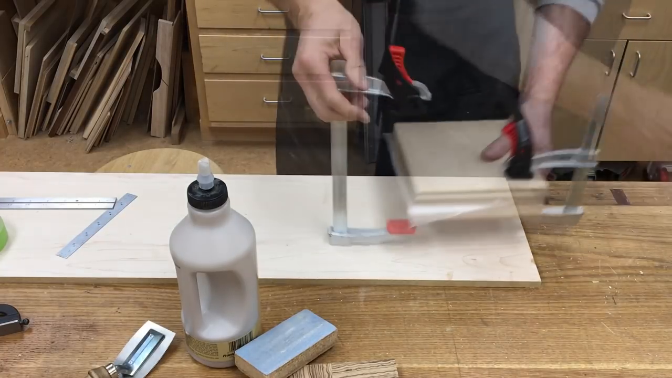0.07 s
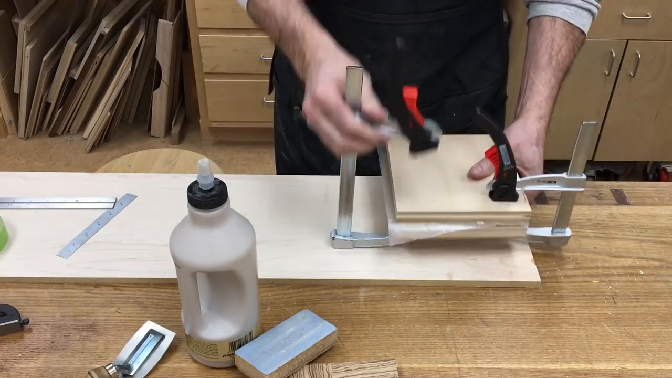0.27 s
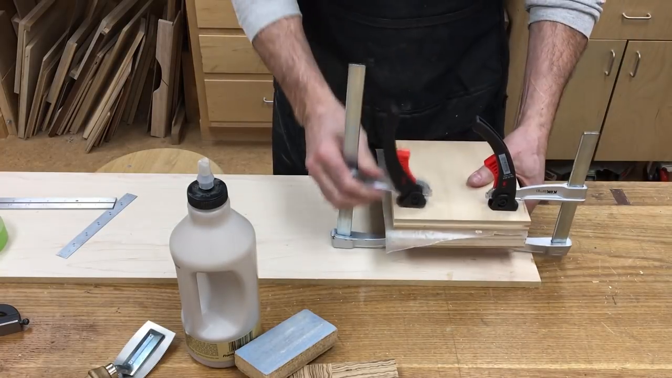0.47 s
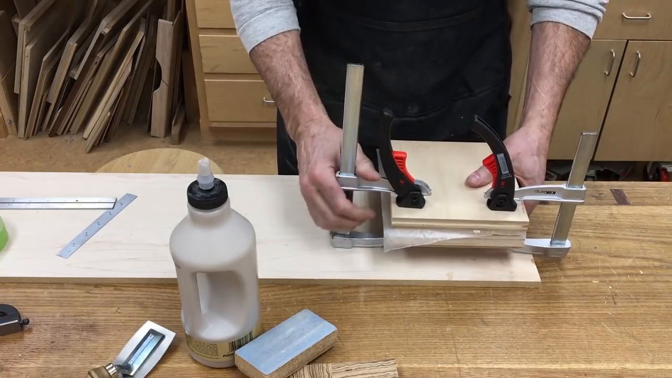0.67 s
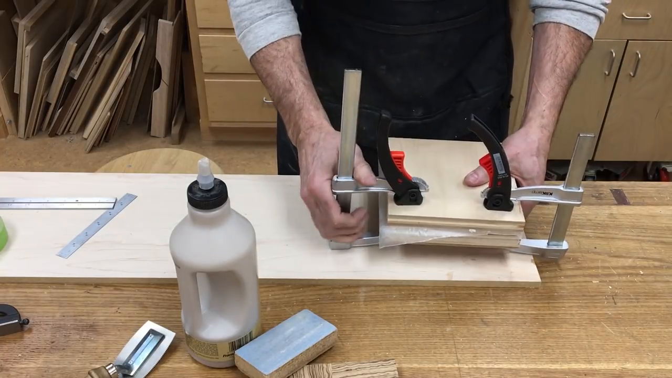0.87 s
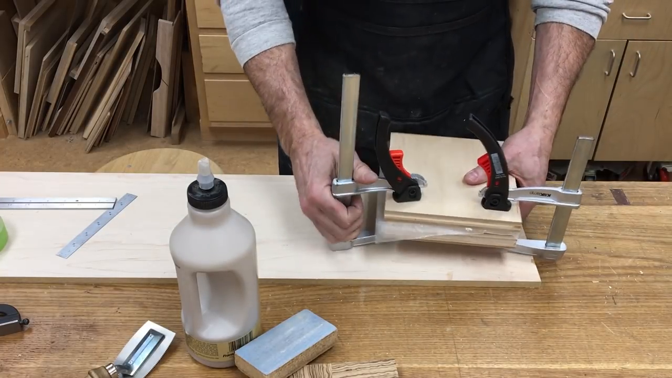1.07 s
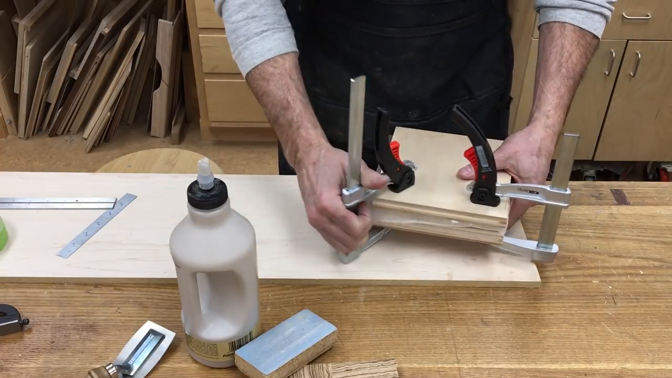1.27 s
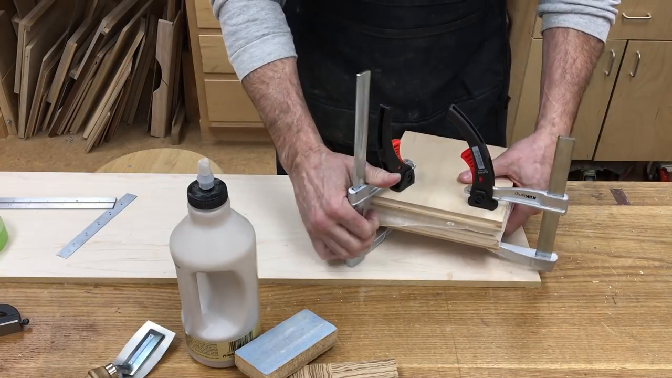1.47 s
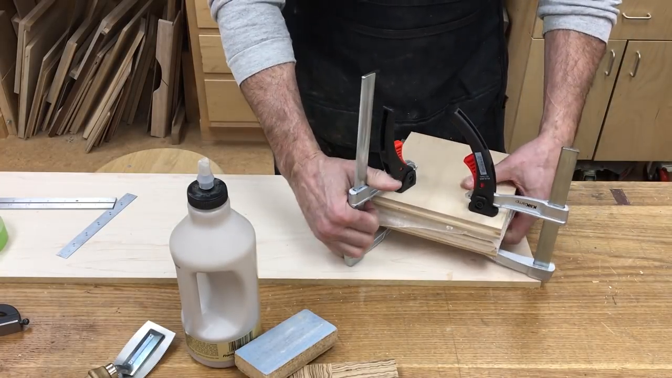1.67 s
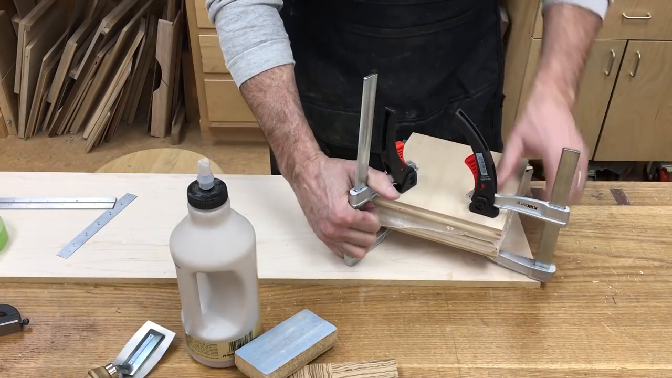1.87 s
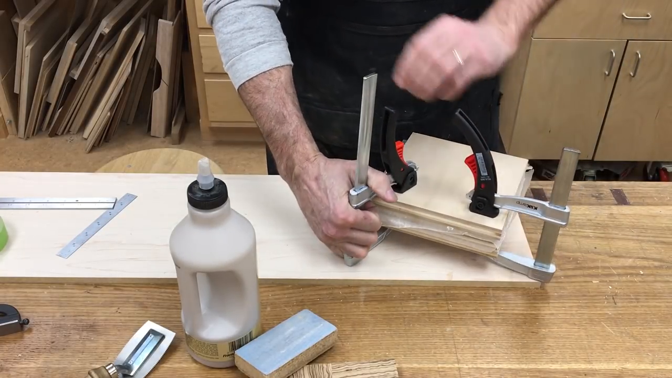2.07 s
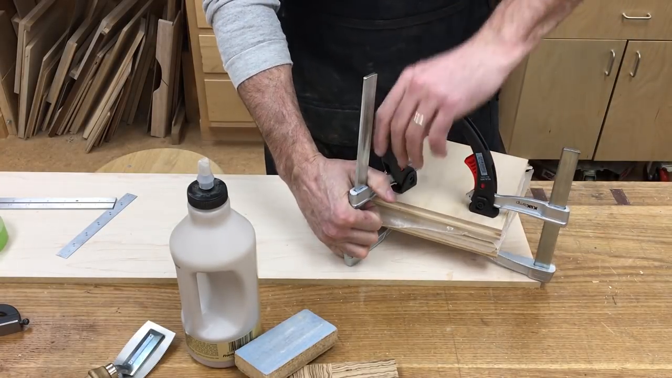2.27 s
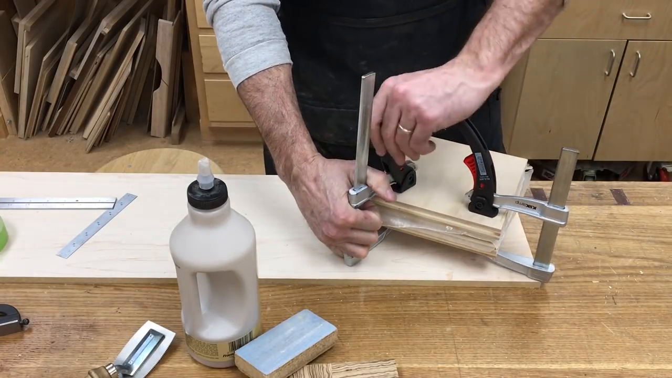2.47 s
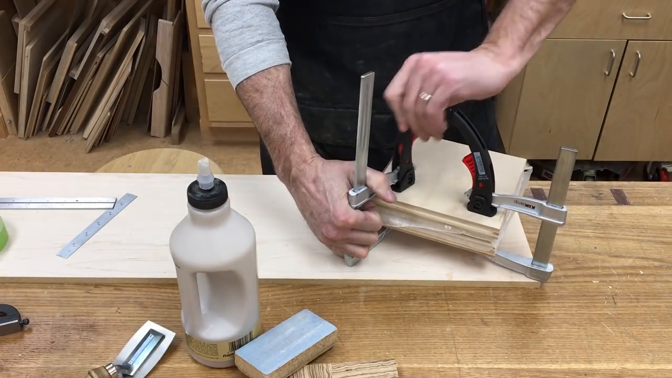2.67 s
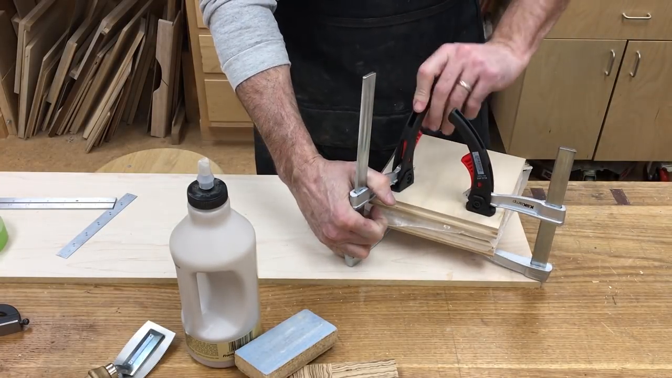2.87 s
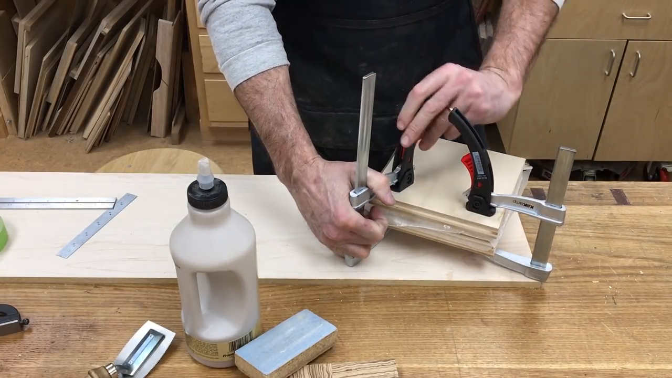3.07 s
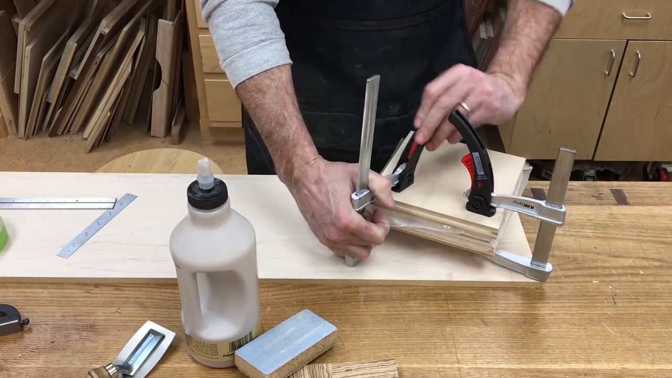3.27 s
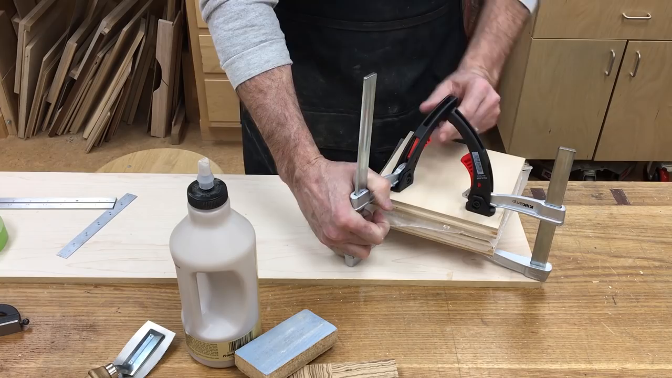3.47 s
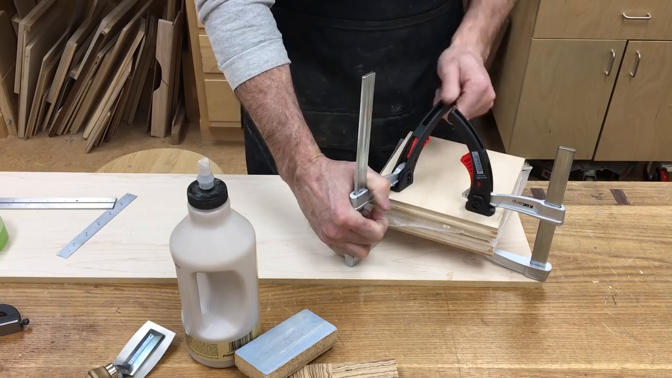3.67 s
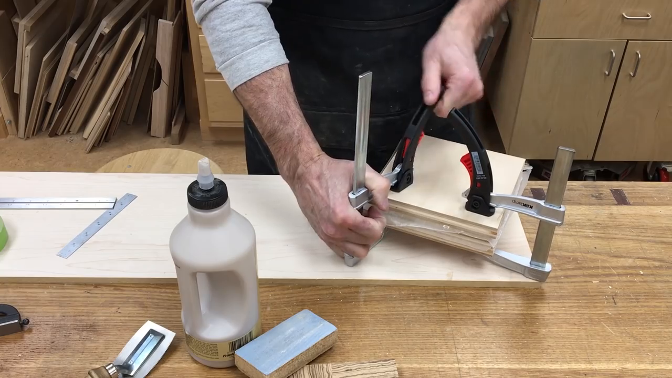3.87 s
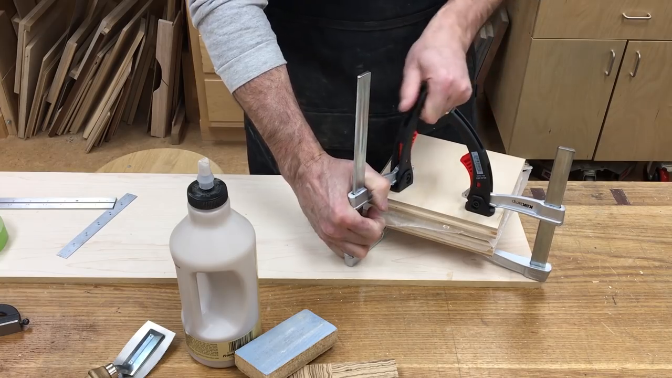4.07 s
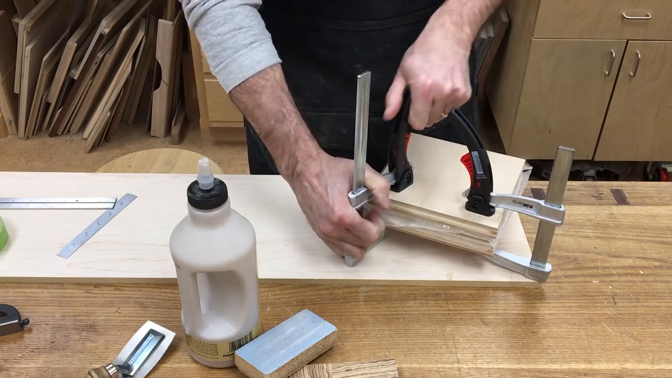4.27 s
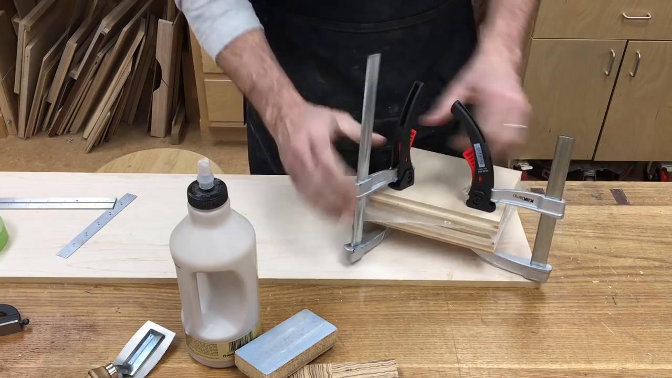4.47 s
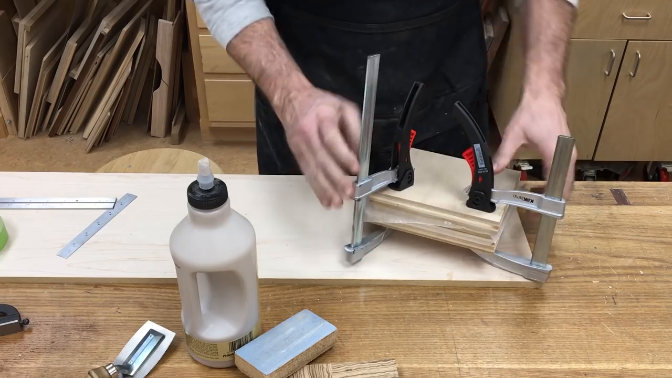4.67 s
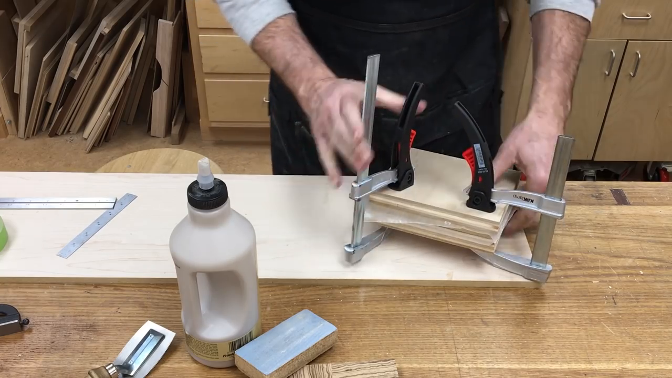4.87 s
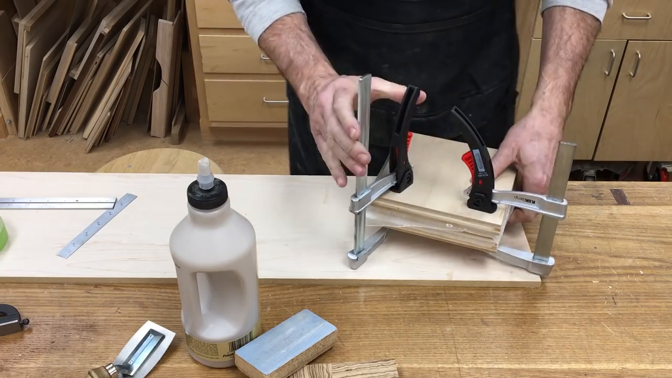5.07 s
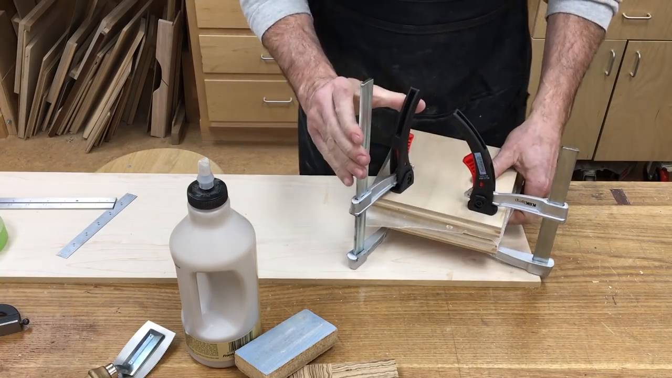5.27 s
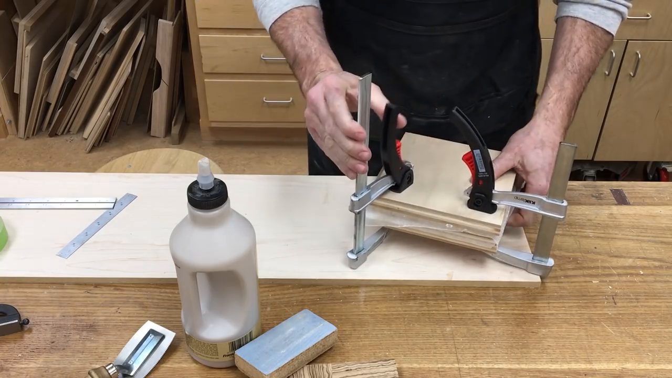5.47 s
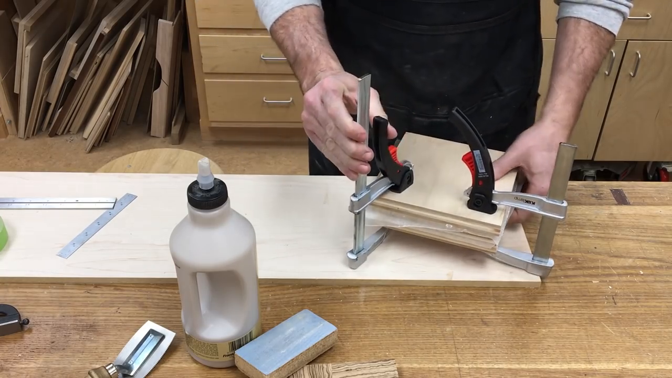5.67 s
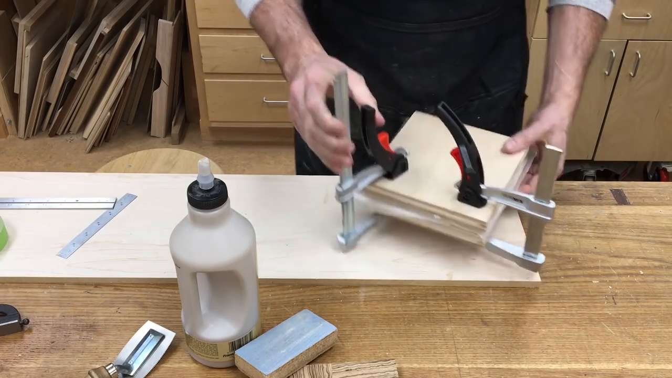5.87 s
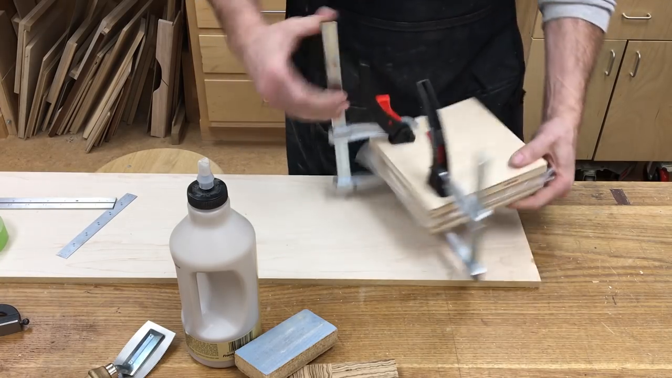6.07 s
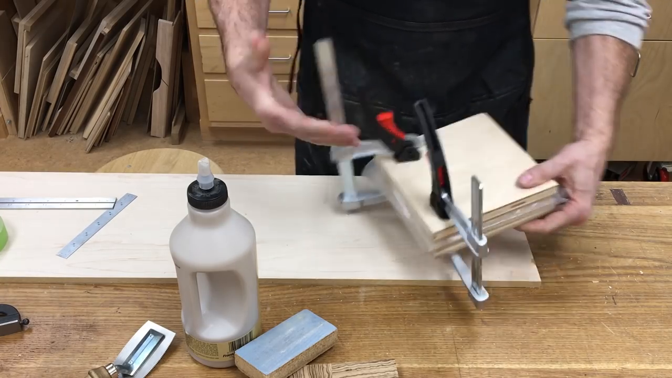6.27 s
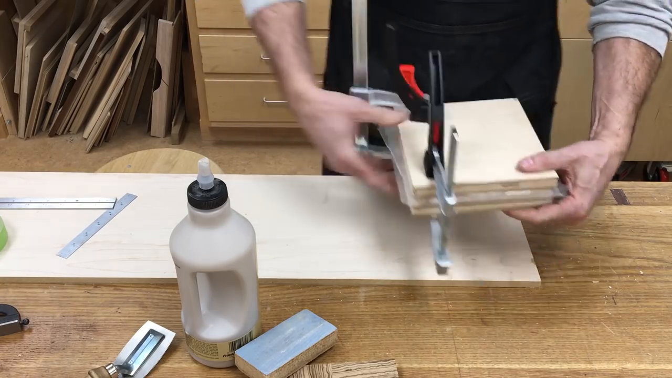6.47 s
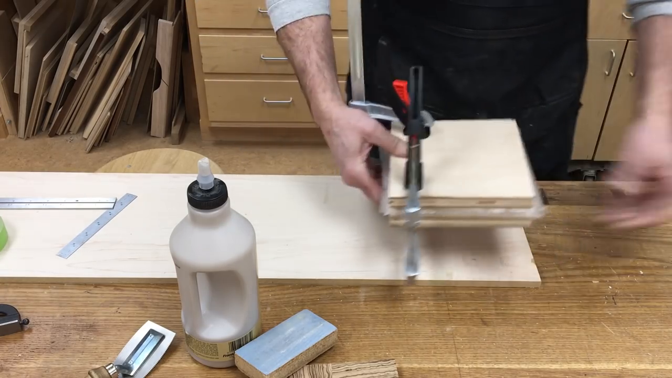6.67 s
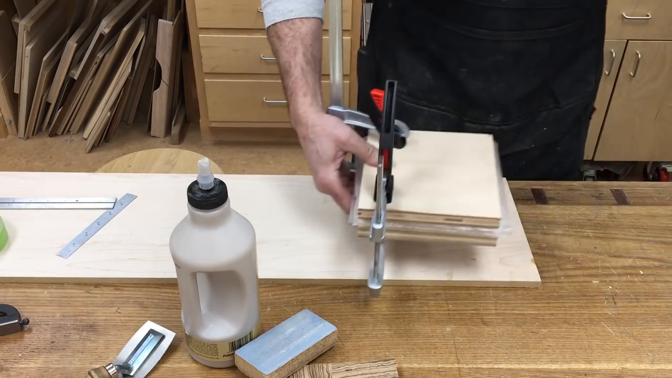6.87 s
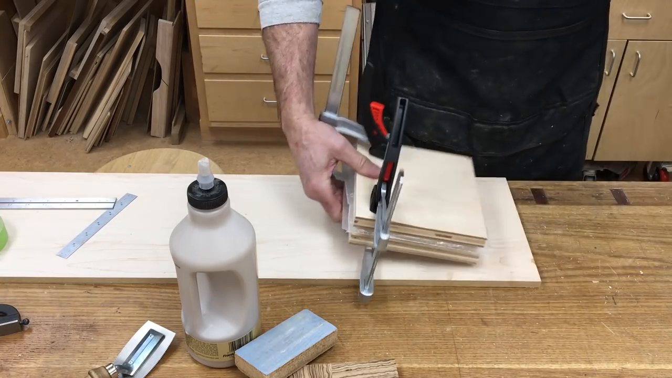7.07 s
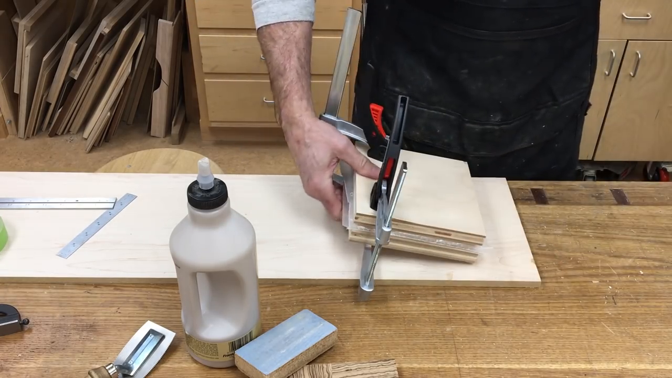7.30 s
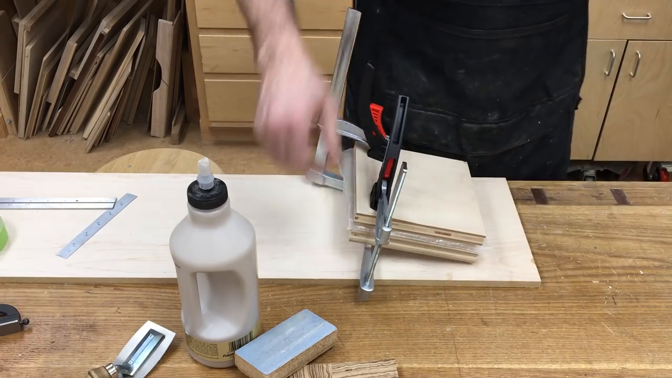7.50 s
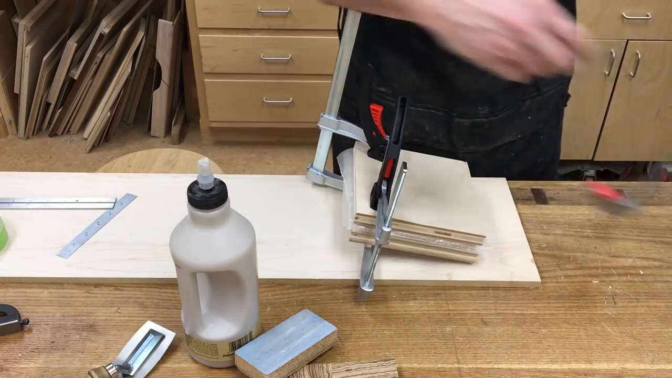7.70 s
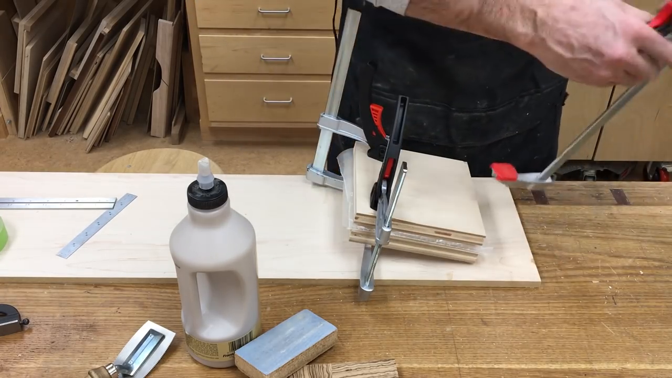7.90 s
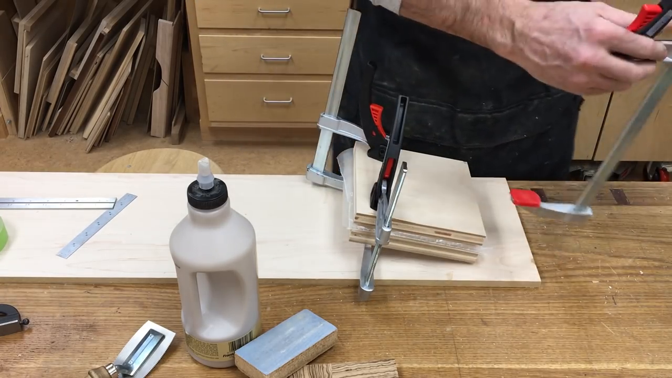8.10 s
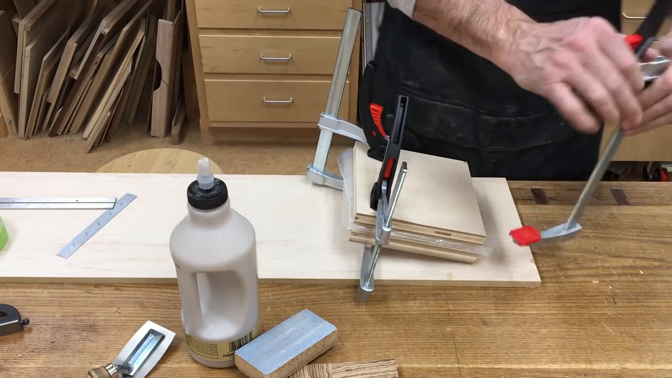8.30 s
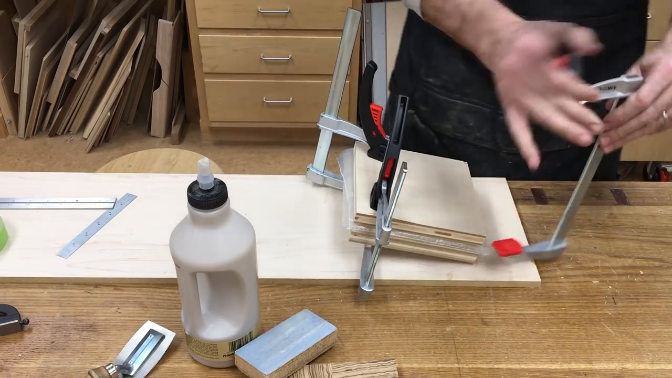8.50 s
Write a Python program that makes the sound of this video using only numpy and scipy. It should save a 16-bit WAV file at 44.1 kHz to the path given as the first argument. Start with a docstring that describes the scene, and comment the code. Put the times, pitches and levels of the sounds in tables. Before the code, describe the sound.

Close, mono view of a workbench in a small workshop with a low hum. A loud metal-and-wood clack opens, then a jaw jangles and catches down a steel bar to a hard click. Quiet handling follows, then a burst of ratchet clicks, a rattling set-down, four more clicks, and scattered wooden thuds with a few metal ticks.

```python
"""Lever bar clamps click and rattle as they are set on a small plywood press on a workbench.
Each metal contact is a short rough force that excites resonant modes of lever, bar or pad; knocks excite wood modes
and a damped thump. Clumped, filtered noise swells around them and fades like a long room tail; palms or sleeves brush
past as short hisses; a workshop hums behind as noise and a low drone.
Wall reflections follow the contacts, and loud blows saturate near full scale."""
import sys
import numpy as np
from scipy import signal
from scipy.fft import rfft, irfft, next_fast_len
from scipy.io import wavfile
from scipy.ndimage import map_coordinates

SR = 44100
rng = np.random.default_rng(int(sys.argv[2]) if len(sys.argv) > 2 else 0)


def unload_wav(signal):
    """Save mono or channel-first audio to the path in sys.argv[1] as 16-bit WAV at rate SR, clipped to [-1, 1]."""
    wavfile.write(
        sys.argv[1],
        SR,
        np.round(np.clip(np.atleast_2d(signal).T, -1, 1) * 32767).astype(np.int16),
    )


def gain_from_decibels(decibels):
    """Convert decibel values to linear amplitude factors."""
    exponent = np.asarray(decibels, float) / 20
    return 10 ** exponent


N = 376613  # samples
SPAN = 4096  # samples in one contact force
LEVER_FROM_S = 1  # touches from here on ring with the lever's modes, earlier ones with the bar's

# ratchet clicks: snap_s, peak_db, touch_lead_s (tooth touch before snap), touch_db (relative to snap)
CLICKS = [(0.7153, 6.5, .009, -7), (3.5912, -1, 0.0032, -36.5), (3.9944, 5.5, 0.0096, -23),
          (4.0965, 3.5, .009, -13.5), (4.1597, 1.5, 0.01, -20), (4.3003, 2.5, 0.0086, -24),
          (4.351, 1.5, 0.0032, -18), (4.3955, 0.5, 0.0087, -22.5), (5.5894, 4.5, 0.0031, -30.5),
          (5.6376, 3.5, 0.0053, -42.5), (5.7299, 1.5, 0.0076, -22.5), (5.8083, -0.5, .008, -15.5)]
# metal touching metal: start_s, peak_db, length_s, tilt_db_per_octave
TOUCHES = [(0.017, -22.5, 0.012, -10), (0.1917, -36.5, .006, -1.5), (0.359, -37, 0.003, -8.5),
           (0.382, -21, 0.0062, -10), (0.412, -14.5, 0.0064, -9.5), (0.443, -31, 0.0034, 1.5),
           (0.515, -18, 0.0089, -8.5), (0.564, -30, .007, -1.5), (1.4616, -22, 0.0019, -2.5),
           (1.482, -25, 0.0047, 4.5), (1.528, -32, 0.0093, -0.3), (1.589, -27.5, 0.0062, -2),
           (1.829, -26, 0.0045, -3), (2.676, -18, 0.0032, -13), (2.952, -25, 0.0024, -17),
           (3.334, -25.5, 0.0034, -12.5), (3.341, -19, 0.0033, -8), (3.53, -30, 0.0026, -14.5),
           (5.565, -36, 0.0023, 1.2), (6.262, -22.5, 0.0064, -1.5), (6.515, -25.5, 0.0033, -1.5),
           (7.342, -13, 0.0037, -15), (7.573, -24.5, 0.0076, -10.5), (7.649, -35, .005, -18.5),
           (7.792, -31, 0.0048, -12.5), (8.103, -34, 0.0037, -9), (8.1344, -9.5, 0.0042, -8.5),
           (8.16, -14, 0.005, -7.5), (8.396, -33.5, .004, -13)]
# press and clamp feet on the bench: start_s, tap_peak_db, tap_hz, thump_peak_db, thump_hz
KNOCKS = [(0.02, -27.5, 566, -31.5, 294), (0.223, 4.5, 1043, -5.5, 391), (0.241, -9.5, 510, -13, 148),
          (.383, -29.5, 517, -27, 287), (.411, -25, 582, -20.5, 288), (.717, -9.5, 850, -21.5, 290),
          (1.516, -20, 560, -25.5, 178), (1.809, -21.5, 1070, -28, 155), (2.957, -34, 800, -28, 160),
          (3.34, -31.5, 1128, -31.5, 226), (3.523, -33, 820, -28, 148), (3.592, -24.5, 525, -18, 283),
          (4.544, -29, 666, -21, 165.4), (4.660, -28.5, 498, -14, 190), (4.6725, -2.5, 1063, -5, 124.6),
          (4.6952, -5, 1690, -25, 100), (4.708, -10, 1075, -16.5, 149), (4.726, -19.5, 770, -13, 100),
          (5.155, -28, 1063, -44, 165), (5.288, -36.5, 830, -27, 154), (5.358, -24.5, 1024, -27, 288),
          (5.97, -36.5, 586, -23.5, 179), (6.026, -30, 942, -34, 152), (6.3786, -4, 920, -4.5, 169),
          (7.2792, -10.5, 960, -4.5, 173), (7.347, -7, 1050, -9, 223), (7.355, -10, 910, -5, 110),
          (7.369, -9.5, 1230, -7.5, 198), (7.385, -12.5, 655, -24, 146), (7.545, -33, 766, -34.5, 293)]
# hiss that swells around clicks and knocks: time_s, level_db (below 7500 Hz), treble_db (above)
HISS_LEVEL = [(0.0, -53, -64), (0.26, -57, -68), (0.43, -43, -49), (0.62, -41, -47.5), (0.76, -50.5, -57),
              (1.05, -64, -63.5), (4.04, -63.5, -68.5), (4.18, -49.5, -56.5), (4.66, -54, -56.5),
              (4.8, -66.5, -68), (5.64, -63, -61), (5.73, -46.5, -57), (6.25, -59.5, -56.5),
              (6.57, -68, -72.5), (7.3, -60.5, -66.5), (7.44, -53, -54.5), (7.85, -61, -67),
              (8.54, -60.5, -65)]
# modes of lever and pawl, damped by the hand: centre_hz, width_hz, relative_db
LEVER_MODES = [(2260, 250, -10), (3300, 400, -4), (3560, 260, 0), (4200, 400, -8), (4770, 350, -9),
               (5500, 260, -3), (6300, 250, -8), (6850, 300, -7), (7500, 400, -11), (8400, 400, -11),
               (9170, 700, -9), (11700, 500, -14), (12600, 400, -16)]
# modes of the steel bar: centre_hz, width_hz, relative_db
BAR_MODES = [(3500, 250, -8), (4360, 200, -7), (4730, 90, -4), (5520, 90, -6), (5760, 90, -6),
             (6850, 150, -5), (7160, 60, 0), (7800, 120, -11), (9090, 110, -1), (11200, 60, -2),
             (12500, 80, -10), (13150, 70, -2), (14200, 80, -10)]
# modes of plywood and bench top: centre_hz, width_hz, relative_db
WOOD_MODES = [(290, 90, 2), (370, 90, 2), (450, 100, 1), (590, 150, 0), (800, 180, -5), (1030, 250, -3),
              (1450, 280, -7), (1750, 300, -9), (2300, 450, -11)]
# spectrum of workshop air: frequency_hz, relative_db_per_hz
AIR_SPECTRUM = [(15, -59.5), (25, -32.5), (39, -13.5), (64, 0.5), (108, -9), (175, -9), (301, -16),
                (641, -26.5), (1190, -26), (2350, -33), (2610, -45), (4250, -47), (5140, -61.5),
                (13200, -50.5), (16000, -62.5)]
# slow swell of the low hum: time_s, level_db
DRONE_SWELL = [(0, -45), (2, -52), (4, -42.5), (6, -47), (8.54, -40)]
# spectrum of the hiss and of the brushes: frequency_hz, relative_db_per_hz
HISS_SPECTRUM = [(800, -39), (2500, 1), (3500, 5.5), (6500, 0), (8000, -4), (10500, -11), (13000, -10),
                 (16000, -20)]
# reverberation of the near walls: frequency_hz, t60_s
SHOP_DECAY = [(100, 0.27), (400, 0.23), (1500, 0.15), (5000, 0.14), (13000, 0.065)]
# a palm or sleeve brushes past: middle_s, rms_db (at the middle), length_s, tilt_db_per_octave
BRUSHES = [(0.054, -57.5, 0.016, 3.5), (1.483, -49, 0.14, 3.5), (1.792, -48, 0.023, 8.5),
           (1.883, -41, 0.04, 11), (2.55, -58.5, 0.13, -1.5), (2.957, -49, 0.043, 2.5),
           (3.038, -56, 0.076, 4.5), (3.173, -56.5, 0.038, 3), (3.227, -48, 0.042, 10),
           (5.372, -47.5, 0.044, 5), (5.419, -50, 0.036, 9.5), (6.2, -50, 0.16, 7.5),
           (6.432, -49, 0.099, 7.5), (6.784, -47.5, 0.078, 6.5), (7.6, -48.5, 0.13, -6),
           (5.172, -56, 0.029, 3), (8.214, -50.5, .04, 5), (8.451, -54, 0.13, 8)]
# a loose pressure pad jingles: start_s, peak_db, length_s
JINGLES = [(4.702, -19.5, 0.0063), (4.735, -25, 0.018), (4.765, -40, 0.012), (7.372, -24, 0.018),
           (7.391, -28.5, 0.016)]
# modes of the pad: centre_hz, width_hz, relative_db
PAD_MODES = [(3880, 300, 3.5), (4900, 660, -3), (6010, 220, 3.5), (7350, 210, -22.5)]
# jangle of the jaw sliding down the bar: time_s, level_db
SLIDE_LEVEL = [(.2, -79.5), (.25, -47.5), (.33, -51), (.4, -58.5), (.5, -38), (.6, -44.5), (.7, -43),
               (.76, -45.5), (.85, -75), (2.49, -87), (2.505, -64), (2.62, -63), (2.67, -76.5)]
# bench rumble under the hands: time_s, level_db
RUMBLE_LEVEL = [(0, -45.5), (.7, -35), (1, -44.5), (2.5, -63), (4, -46.5), (5.5, -48.5), (7, -52.5),
                (8.54, -50.5)]
# the sliding jaw catches on the bar: start_s, peak_db, jolt_db (tap in the wood)
CATCHES = [(0.2268, 4, -16.5), (0.4616, -3, -18.5), (0.538, 0.5, -12.5), (0.615, -2, -15)]
# a loose clamp is dragged and chatters: start_s, length_s, peak_db (of the loudest possible tick)
DRAGS = [(7.927, .06, -22.5), (9, .03, -31.5)]


def unit(x):
    """Normalization: the signal is scaled to rms 1."""
    return x / np.sqrt(np.mean(x ** 2) + 1e-20)


def peak(x, db):
    """Normalization: the signal is scaled to a peak level."""
    return gain_from_decibels(db) * x / np.abs(x).max()


def along(points, hz):
    """Interpolation: (frequency, value) points are joined on a logarithmic frequency axis."""
    f, v = np.transpose(points)
    return np.interp(np.log(hz + 1), np.log(f + 1), v)


def filtered(x, response):
    """Linear filtering: the spectrum is multiplied by a complex response of frequency."""
    m = next_fast_len(2 * SPAN + len(x))
    hz = np.fft.rfftfreq(m, 1 / SR)
    return irfft(rfft(x, m) * response(hz), m)[:len(x)]


def wobble(rate):
    """Slow fluctuation: a smooth curve passes through random knots, rate of them a second."""
    knots = rng.standard_normal(int(N * rate / SR) + 4)
    return map_coordinates(knots, [np.arange(N) * rate / SR])


def body(modes, hz, scatter_db):
    """Modal superposition: causal resonances add, each excited anew at a random strength."""
    chance = gain_from_decibels(scatter_db * rng.standard_normal(len(modes)))
    total = 0
    for k, (centre, width, db) in enumerate(modes):
        resonance = 1j * hz * width / (centre * centre - hz * hz + 1j * hz * width)
        total = total + (-1) ** k * chance[k] * gain_from_decibels(db) * resonance
    return total


def whitened(force):
    """Broadband excitation: a flat magnitude spectrum drives all modes alike; phases are kept."""
    return irfft(np.exp(1j * np.angle(rfft(force))))


def burst(delay, length, rise):
    """Rough contact: a noisy force rises fast and dies within about length seconds."""
    t = np.clip(np.arange(SPAN) / SR - delay, 0, None)
    shape = (1 - np.exp(-t / rise)) * np.exp(-(t / length) ** 2)
    force = whitened(rng.standard_normal(SPAN) * shape) * np.sqrt(shape)
    return force / np.abs(force).max()


def blow(delay, length, grit_db):
    """Impulsive contact: one sharp push is followed by fading grit."""
    t = np.arange(SPAN) / SR
    fade = np.exp(-(t / length) ** 2)
    force = gain_from_decibels(grit_db) * rng.standard_normal(SPAN) * fade / np.sqrt(length * SR)
    force[0] = 1
    return np.roll(whitened(force) * np.sqrt(fade), round(delay * SR))


def steel(force, modes, tilt, ring_db, crack_db, low_hz):
    """Forced vibration: modes ring over the broad contact crack; steel this small radiates no bass."""
    def response(hz):
        colour = (np.maximum(hz, low_hz) / 5000) ** (tilt / 6)
        bass_cut = (1j * hz / (low_hz + 1j * hz)) ** 3
        return colour * bass_cut * (gain_from_decibels(ring_db) * body(modes, hz, scatter_db=3.0) + gain_from_decibels(crack_db))
    return filtered(force, response)


def add(track, s, sound, wet_db):
    """Reverberation: the direct sound is followed by decaying noise-like tails from near and far walls."""
    linger, linger_db = 2.9, -17.5  # the far walls answer this many times longer, and weaker
    hz, t, z = signal.stft(rng.standard_normal(SR // 3), SR, nperseg=256)
    fall_db = -60 * t / along(SHOP_DECAY, hz)[:, None]
    decay = gain_from_decibels(fall_db) + gain_from_decibels(linger_db + fall_db / linger)
    tail = signal.istft(z * decay, SR, nperseg=256)[1]
    tail = gain_from_decibels(wet_db) * tail / np.linalg.norm(tail)
    tail = np.pad(tail, (round(0.0064 * SR), 0))  # the first wall arrives late
    tail[0] = 1  # direct sound
    heard = signal.fftconvolve(sound, tail)
    track[round(s * SR):][:len(heard)] += heard


def swelling_hiss():
    """Modulated noise: hiss swells around clicks and knocks and fades like a long room tail, dull and bright."""
    s, level_db, treble_db = np.transpose(HISS_LEVEL)
    time = np.arange(N) / SR
    bands = ((level_db, lambda hz: 1 / (1 + (hz / 7500) ** 4)),
             (treble_db, lambda hz: 1 / (1 + (7500 / (hz + 1)) ** 4)))
    sound = 0
    for db, band in bands:
        grains = rng.standard_normal(N) * gain_from_decibels(1.6 * wobble(300) + 4.3 * wobble(40))
        hiss = unit(filtered(grains, lambda hz: band(hz) * gain_from_decibels(along(HISS_SPECTRUM, hz))))
        sound = sound + gain_from_decibels(np.interp(time, s, db)) * hiss
    return sound


def workshop():
    """Background noise: nearly steady shaped air noise joins an unsteady mains drone and its second harmonic."""
    air = unit(filtered(rng.standard_normal(N), lambda hz: gain_from_decibels(along(AIR_SPECTRUM, hz))))
    time = np.arange(N) / SR
    phase = 2 * np.pi * 59 * time + 0.4 * wobble(7.8)
    drone = np.sin(phase) + gain_from_decibels(-14) * np.sin(2 * phase)
    swell = gain_from_decibels(np.interp(time, *np.transpose(DRONE_SWELL)) + 0.83 * wobble(11))
    return gain_from_decibels(-39.5 + 0.38 * wobble(7.8)) * air + swell * drone


def bench_rumble():
    """Resonant filtering: two low modes colour noise as the bench shakes under the hands."""
    modes = [(100, 40, -0.45), (160, 51, -1.6)]  # centre_hz, width_hz, relative_db
    rumble = unit(filtered(rng.standard_normal(N), lambda hz: body(modes, hz, 0) ** 2))
    shake_db = np.interp(np.arange(N) / SR, *np.transpose(RUMBLE_LEVEL)) + 3.0 * wobble(7.6)
    return gain_from_decibels(shake_db) * rumble


def touches():
    """Contact excitation: metal parts tick and rattle together; longer rattles swell more slowly."""
    track = np.zeros(N + SR)
    catches = [(s, db, 0.0053, -5.5) for s, db, _ in CATCHES]
    grazes = [(s - 0.0028, db - 8.5, .003, -3) for s, db, _ in CATCHES]  # a graze precedes each catch
    feet = [(s, db - 22, .0015, -11) for s, db, *_ in KNOCKS if s > LEVER_FROM_S]  # the steel foot's tick
    stray = [(LEVER_FROM_S + u * (N / SR - LEVER_FROM_S), -39 + 2 * (2 * v - 1), .003, -6)
             for u, v in rng.random((12, 2))]  # faint ticks at chance moments
    for s, db, length, tilt in TOUCHES + catches + grazes + feet + stray:
        force = burst(0, length, 0.3 * length)
        if s < LEVER_FROM_S:
            tick = steel(force, BAR_MODES, tilt, ring_db=6, crack_db=-11.5, low_hz=3000)
        else:
            tick = steel(force, LEVER_MODES, tilt, ring_db=-6, crack_db=-11.5, low_hz=1990)
        add(track, s, peak(tick, db), wet_db=-14.5)
    return track[:N]


def knocks():
    """Impact on a plate: a hard tap excites the wood, then the bench top thumps as the weight lands."""
    shuffle_s, softer_longer = 0.0095, 0.38  # grit length under a 0 dB tap; its growth in soft taps
    track, t = np.zeros(N + SR), np.arange(SPAN) / SR
    jolts = [(s, db, 550, db - 2, 295) for s, _, db in CATCHES]
    for s, tap_db, tap_hz, thump_db, thump_hz in KNOCKS + jolts:
        force = blow(0, shuffle_s * gain_from_decibels(-softer_longer * tap_db), 3.5)
        spot = [(tap_hz, 0.27 * tap_hz, 1.5)]

        def tap_response(hz):
            modes = body(spot, hz, 0) + gain_from_decibels(-5.5) * body(WOOD_MODES, hz, scatter_db=3.0)
            return modes / (1 + 1j * hz / 2800) ** 2
        tap = filtered(force, tap_response)
        cycles = thump_hz * t
        weight = cycles * np.exp(-(cycles / 2.2) ** 2)  # the weight settles over a few cycles, then damps the top
        ring = .3 * (1 - np.exp(-cycles)) * gain_from_decibels(-3.5 * cycles)
        thump = (weight + ring) * np.sin(2 * np.pi * cycles)
        # the landing weight also sounds the lowest modes of the wood
        board = filtered(blow(0, .012, 3),
                         lambda hz: body(WOOD_MODES, hz, scatter_db=2.5) / (1 + 1j * hz / 500) ** 2)
        knock = peak(tap, tap_db) + peak(thump, thump_db) + peak(board, thump_db - 6.5)
        add(track, s, knock, wet_db=-10.5)
    return track[:N]


def brushes():
    """Amplitude modulation: grainy hiss swells and fades as a palm or sleeve passes."""
    track, t = np.zeros(N + SR), np.arange(-SR // 4, SR // 4) / SR
    for s, db, length, tilt in BRUSHES:
        grains = rng.standard_normal(len(t)) * gain_from_decibels(3.6 * wobble(200)[:len(t)])
        hiss = unit(filtered(grains, lambda hz: gain_from_decibels(along(HISS_SPECTRUM, hz)) * (hz / 5000 + .1) ** (tilt / 6)))
        swell = np.exp(-(2 * t / length) ** 4)
        track[round(s * SR):][:len(t)] += gain_from_decibels(db) * swell * hiss
    return track[SR // 4:][:N]  # each swell is centred on its time


def bar_jangle():
    """Sustained excitation: dense random grains, as of many tiny contacts, keep the bar ringing."""
    grains = rng.standard_normal(N) * gain_from_decibels(5.3 * wobble(250))
    jangle = unit(steel(grains, BAR_MODES, tilt=-1.7, ring_db=0, crack_db=-6.5, low_hz=3000))
    return gain_from_decibels(np.interp(np.arange(N) / SR, *np.transpose(SLIDE_LEVEL))) * jangle


def ratchet():
    """Snap and rebound: the pawl touches a tooth and snaps over it; the jaw passes the blow to the wood."""
    track = np.zeros(N + SR)
    for s, db, lead, touch_db in CLICKS:
        rebound = gain_from_decibels(-4.5) * burst(lead + 0.003, 0.0033, 0.00088)
        touch = gain_from_decibels(touch_db) * burst(0, 0.0066, 0.0001)
        soft = filtered(rebound + touch, lambda hz: 1 / (1 + 1j * hz / 6000))  # light contacts are duller
        force = burst(lead, 0.0017, 0.0012) + soft
        push = blow(lead, 0.024, 0) + gain_from_decibels(touch_db) * blow(0, 0.0038, 0)
        knock = filtered(push, lambda hz: body(WOOD_MODES, hz, scatter_db=2.5) * (hz / 1000) ** 0.18)
        click = steel(force, LEVER_MODES, tilt=-3, ring_db=0, crack_db=-20, low_hz=2200)
        add(track, s - lead, peak(click, db) + peak(knock, db - 13), wet_db=-15.5)
    return track[:N]


def pad_jingles():
    """Modal ringing: short rough forces excite the loose pressure pad when the press lands."""
    track = np.zeros(N + SR)
    for s, db, length in JINGLES:
        force = burst(0, length, 0.26 * length)
        jingle = steel(force, PAD_MODES, tilt=0, ring_db=0, crack_db=-23.5, low_hz=1500)
        add(track, s, peak(jingle, db), wet_db=-5.5)
    return track[:N]


def clamp_chatter():
    """Intermittent contact: a dragged clamp ticks at irregular gaps and random strengths."""
    gap_s = 0.0045  # mean gap between contacts
    track = np.zeros(N + SR)
    for start, length, db in DRAGS:
        for k, (u, v) in enumerate(rng.random((round(length / gap_s), 2))):
            force = burst(0, 0.0033, .0005)
            tick = steel(force, LEVER_MODES, tilt=-10, ring_db=-6, crack_db=-15.5, low_hz=1310)
            add(track, start + (k + u) * gap_s, peak(tick, db - 7 * v), wet_db=-12)
    return track[:N]


def scene():
    """Superposition: the sounds on and around the bench add linearly in one channel."""
    background = swelling_hiss() + workshop() + bench_rumble()
    contacts = touches() + knocks() + brushes() + bar_jangle()
    clamps = ratchet() + pad_jingles() + clamp_chatter()
    return (background + contacts + clamps)[None]


def band_limit(x):
    """A steep low-pass at the top of the band."""
    return signal.sosfilt(signal.butter(12, 16320, fs=SR, output="sos"), x)


def record(dry):
    """Band limiting and saturation: the microphone drops deepest bass and top; the converter clips smoothly."""
    def microphone(hz):
        return (1j * hz / (26 + 1j * hz)) ** 2 / (1 + (hz / 15700) ** 30)
    heard = filtered(dry[0], microphone)[None]
    clipped = heard / (1 + np.abs(heard) ** 8) ** (1 / 8)
    return band_limit(clipped)


dry = scene()
out = record(dry)
unload_wav(out)
```